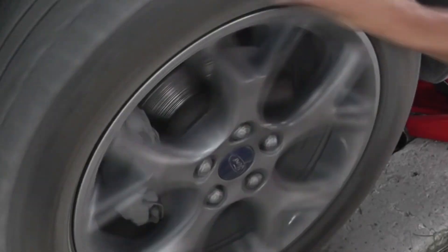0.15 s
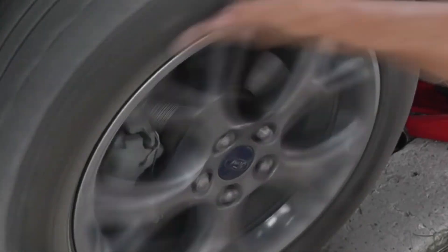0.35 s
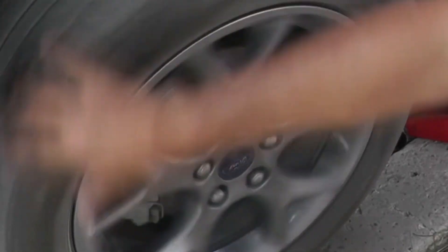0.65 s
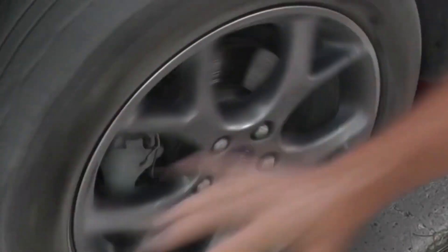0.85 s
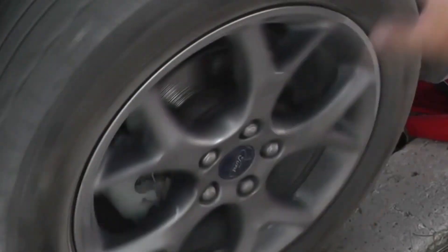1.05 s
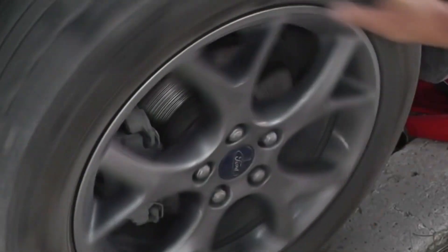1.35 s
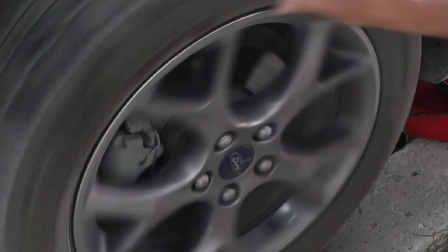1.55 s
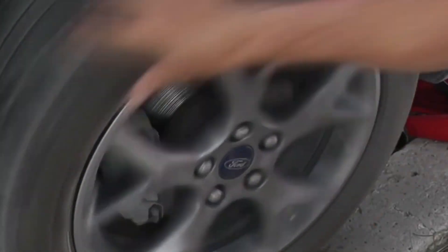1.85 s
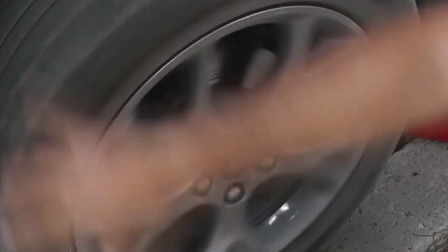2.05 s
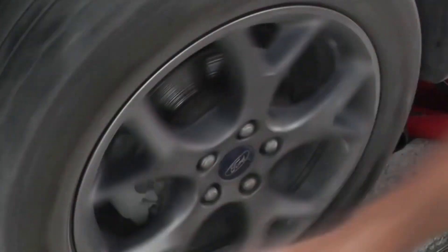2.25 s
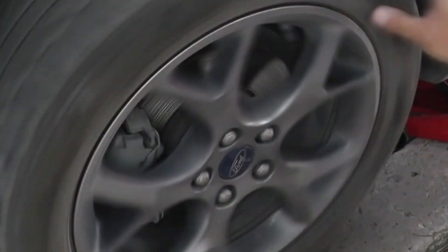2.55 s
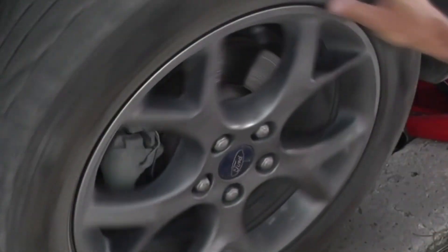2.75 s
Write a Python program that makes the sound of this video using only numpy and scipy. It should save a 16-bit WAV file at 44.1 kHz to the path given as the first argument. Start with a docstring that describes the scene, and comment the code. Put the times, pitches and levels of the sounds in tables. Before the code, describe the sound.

High fluttering squeal of worn car brake pads over a scraping hiss as the wheel turns.

```python
"""A car wheel is spun by hand while its worn brake pads drag on the disc.
From the start the rubbing scrapes and rings the disc and the caliper (the clamp holding the pads),
and the wheel drones faintly. Friction also locks two of the disc's own notes into a fluttering squeal.
The lower one peaks near 0.5 s, just after the first of several dull scuffs. The higher one takes over,
fades near 1.4 s, swells again and dies down as the scrape goes on to the end."""
import sys
import numpy as np
from scipy import signal
from scipy.fft import rfft, irfft
from scipy.io import wavfile
from scipy.ndimage import uniform_filter1d

SR = 44100
rng = np.random.default_rng(int(sys.argv[2]) if len(sys.argv) > 2 else 0)


def store_pcm(level_fs):
    """Save levels as 16-bit WAV."""
    pcm = np.round(np.clip(level_fs, -1, 1) * 32767).astype(np.int16)
    wavfile.write(sys.argv[1], SR, np.atleast_2d(pcm).T)


N = 127890
T = np.arange(N) / SR
HZ = np.fft.rfftfreq(N, 1 / SR)


def amp(db):
    """Turns decibels into a number to multiply by."""
    return 10 ** (np.asarray(db) / 20)


def unit(x):
    """Scales a signal to an average strength (rms) of 1."""
    return x / np.sqrt(np.mean(abs(x) ** 2) + 1e-20)


def curve(rows):
    """Joins (time_s, value) rows by straight lines."""
    return np.interp(T, *np.transpose(rows))


def bump(peak_s, half_length_s):
    """A smooth rise to 1 and back."""
    return np.exp(-.5 * ((T - peak_s) / half_length_s) ** 2)


def noise(gain):
    """Noise of strength 1, shaped by a gain for each frequency."""
    return unit(irfft(rfft(rng.standard_normal(N)) * gain, N))


def wander(rate_hz):
    """Smooth random wobble, up to about the given rate."""
    return noise((HZ > 0) / (1 + (HZ / rate_hz) ** 4))


def coloured(colour):
    """Noise with a given tone colour; countless weak resonances make it slightly metallic."""
    pitch_hz, level_db = np.transpose(colour)
    outline_db = np.interp(np.log(HZ + 1), np.log(pitch_hz), level_db)
    window = np.hanning(round(2 * 22 / HZ[1]))  # ripples about 22 Hz wide
    ripple = unit(signal.oaconvolve(rng.standard_normal(len(HZ)), window, "same"))
    depth_db = 2.8 * HZ ** 2 / (HZ ** 2 + 450 ** 2)  # the bass stays smooth
    low_cut = 1 + (1.18 * pitch_hz[0] / (HZ + 1)) ** 4
    high_cut = 1 + (HZ / (1.04 * pitch_hz[-1])) ** 4
    return noise(amp(outline_db + depth_db * ripple) / (low_cut * high_cut))


def patchy(x):
    """The spot where the pad touches keeps shifting, so each pitch range swells and sinks on its own."""
    patch_hz, patch_s = 200, 0.06
    spectra = signal.stft(x, nperseg=512)[2]
    across_pitch = np.hanning(round(2 * patch_hz * 512 / SR))
    across_time = np.hanning(round(2 * patch_s * SR / 256))
    patch = np.outer(across_pitch, across_time)
    swell_db = 1.8 * unit(signal.fftconvolve(rng.standard_normal(spectra.shape), patch, "same"))
    return unit(signal.istft(spectra * amp(swell_db))[1][:N])


def ringing(notes):
    """Rubbing makes a part ring at its own notes, each a narrow band of noise."""
    out = np.zeros(N)
    for pitch_hz, width_hz, level_db in notes:
        offset = 2 * (HZ - pitch_hz) / width_hz
        out += amp(level_db) * noise(1 / np.sqrt(1 + offset ** 2) / (1 + (offset / 12) ** 2))
    return out


def scrape():
    """The pads rub the disc with a gritty rasp and a hiss, and the disc rings along."""
    # loudness of the rasp and of the hiss: time_s, level_db
    rasp_levels = [(0.0, -44), (0.175, -42.5), (0.195, -46), (0.355, -40.5), (0.785, -46), (0.855, -42),
                   (1.17, -46.5), (1.19, -44), (1.3, -49), (1.34, -45), (1.515, -45.5), (1.945, -43),
                   (1.97, -44), (2.0, -42), (2.215, -48), (2.225, -44), (2.365, -46), (2.47, -44.5),
                   (2.725, -45), (2.9, -46.5)]
    hiss_levels = [(0.0, -56), (0.08, -56), (0.36, -48.5), (0.41, -53), (0.5, -56), (0.55, -53.5),
                   (0.81, -55.5), (0.86, -49.5), (0.98, -57.5), (1.0, -53.5), (1.32, -59), (1.36, -51.5),
                   (1.47, -56.5), (1.8, -50), (2.3, -55.5), (2.54, -53.5), (2.72, -60), (2.9, -56)]
    # their tone colours: pitch_hz, level_db
    rasp_colour = [(2500, -12.5), (3600, -4), (4200, -4), (4500, -4.5), (5000, -3.5), (5380, -4.5),
                   (5900, -1), (6150, -6), (6520, -8), (6900, 2.5), (7600, -4.5), (8500, -20)]
    hiss_colour = [(5000, 1), (7000, 0), (7900, 3), (8600, -3), (9600, 1.5), (11000, -2), (12200, -2),
                   (13800, -12), (15500, -8)]
    # the disc's own notes: pitch_hz, width_hz, level_db
    disc_notes = [(4025, 16, -65), (4066, 10, -59), (4335, 24, -60), (4400, 20, -62), (4475, 30, -62),
                  (4790, 22, -55), (4867, 12, -52), (5220, 20, -60), (5527, 12, -57), (5922, 20, -55),
                  (6000, 30, -62), (6355, 36, -55.5), (6674, 16, -53), (6767, 20, -50.5), (6860, 24, -60),
                  (6991, 20, -56), (7430, 40, -64), (7570, 30, -63)]
    level = curve(rasp_levels)
    rasp = amp(level - 2.5 + 2.6 * wander(rate_hz=32)) * patchy(coloured(rasp_colour))
    hiss = amp(curve(hiss_levels) + 4.5 + 2.03 * wander(rate_hz=26)) * coloured(hiss_colour)
    ring = amp(level - level.mean() - 0.8 + 2.5 * wander(rate_hz=17.8)) * ringing(disc_notes)
    return rasp + hiss + ring


def grind():
    """The lower part of the scrape passes into the caliper and makes it ring."""
    # loudness of the grinding: time_s, level_db
    levels = [(0.0, -57.5), (0.17, -48), (0.22, -52), (0.31, -45), (0.77, -55), (0.89, -48), (0.92, -55),
              (1.04, -51.5), (1.07, -55), (1.54, -50), (1.58, -53.5), (1.65, -49.5), (2.07, -48.5),
              (2.21, -53), (2.24, -48.5), (2.28, -57), (2.38, -50.5), (2.48, -49), (2.85, -59), (2.87, -52),
              (2.9, -57)]
    # its tone colour: pitch_hz, level_db
    colour = [(500, 13), (900, -7.5), (1300, -1.5), (1950, -2), (2450, 1.5), (2850, 10), (3400, -6.5),
              (4500, -5.5)]
    # the caliper's own notes: pitch_hz, width_hz, level_db
    caliper_notes = [(1130, 30, -68), (1200, 25, -66), (1314, 8, -59.5), (1611, 11, -59.5), (1730, 25, -66),
                     (1995, 20, -69), (2050, 20, -68), (2121, 16, -65), (2353, 14, -67), (2725, 16, -66),
                     (2783, 14, -63), (2910, 50, -63), (3020, 30, -66), (3452, 14, -63), (3731, 40, -62)]
    level = curve(levels)
    grinding = amp(level - 4.5 + 2.4 * wander(rate_hz=26)) * patchy(coloured(colour))
    ring = amp(level - level.mean() - 2) * ringing(caliper_notes)
    return grinding + ring


def wheel():
    """The turning wheel drones and gives a hollow hum, and its rim rings with the drone."""
    # loudness of the drone and of the hum: time_s, level_db
    drone_levels = [(0.0, -49.5), (0.41, -51), (0.58, -53.5), (0.78, -58.5), (0.88, -54.5), (1.12, -54.5),
                    (1.28, -50), (1.45, -47), (2.05, -52.5), (2.32, -56), (2.43, -51.5), (2.64, -52),
                    (2.9, -51.5)]
    hum_levels = [(0.0, -72), (0.1, -57.5), (0.37, -70), (0.48, -55.5), (0.8, -64), (0.88, -59.5),
                  (1.1, -64), (1.45, -55), (1.62, -57.5), (2.16, -70.5), (2.52, -53), (2.76, -51.5),
                  (2.9, -57.5)]
    # tone colour of the drone: pitch_hz, level_db
    colour = [(20, -7), (55, -6.5), (110, -5), (200, -2.5), (280, 1.5), (450, -1.5), (700, -1), (1100, -5),
              (2200, -8.5)]
    # ringing of the rim and around the hum: pitch_hz, width_hz, level_db
    rim_notes = [(195, 20, -67), (285, 24, -67), (355, 14, -68), (470, 18, -67), (554, 7, -60.5),
                 (670, 36, -64), (800, 10, -62), (905, 14, -66), (975, 20, -68)]
    hum_notes = [(408, 16, -5)]
    level = curve(drone_levels)
    drone = amp(level - 5.5 + 2.5 * wander(rate_hz=50)) * coloured(colour)
    rim = amp(level - level.mean() - 2.5) * ringing(rim_notes)
    hum_hz = 405 + 3 * wander(rate_hz=14.6)
    tone = np.sqrt(2) * np.sin(2 * np.pi * np.cumsum(hum_hz) / SR)
    hum = amp(curve(hum_levels) + 1) * (amp(-2.5) * tone + ringing(hum_notes))
    return drone + rim + hum


def squeal(levels, pitch_hz, octave_gain=0):
    """Friction keeps one disc note going: a nearly pure tone whose pitch dips when the pad slips."""
    flutter_db, jitter_hz, sag_hz_per_db = 0.55, 3, 2.4
    level = uniform_filter1d(curve(levels), size=300) + flutter_db * wander(rate_hz=45)
    grip_db = level - uniform_filter1d(level, size=5000)  # below zero in a brief dip
    wavering_hz = pitch_hz + sag_hz_per_db * grip_db + jitter_hz * wander(rate_hz=124)
    phase = 2 * np.pi * np.cumsum(wavering_hz) / SR
    return amp(level) * (np.sin(phase) + octave_gain * np.sin(2 * phase)) * np.sqrt(2)


def squeals():
    """Two disc notes take turns at squealing as the disc goes round."""
    # loudness of each squeal: time_s, level_db
    low_levels = [(0.0, -46), (0.065, -38.5), (0.115, -28.0), (0.155, -32), (0.17, -39), (0.205, -30.5),
                  (0.23, -31), (0.25, -41), (0.29, -29.5), (0.31, -26), (0.335, -40), (0.36, -26),
                  (0.455, -20), (0.5, -24), (0.535, -49), (0.585, -26.5), (0.65, -33.0), (0.67, -44),
                  (0.74, -39.5), (0.755, -57.0), (0.78, -41.0), (0.795, -68), (0.925, -38.5), (0.98, -54),
                  (1.055, -40), (1.165, -60), (1.215, -44), (1.24, -58), (1.325, -29.5), (1.405, -33.5),
                  (1.45, -45.5), (1.48, -36), (1.555, -47), (1.65, -34.5), (1.665, -48), (1.75, -36),
                  (1.765, -52), (1.875, -55.0), (1.895, -44.5), (1.985, -56), (2.035, -44), (2.08, -69),
                  (2.17, -43), (2.2, -66), (2.36, -45), (2.42, -65), (2.445, -41), (2.47, -54),
                  (2.505, -50), (2.625, -49), (2.65, -40), (2.83, -44), (2.85, -38.5), (2.9, -49)]
    high_levels = [(0.0, -41.0), (0.035, -52.5), (0.105, -39.5), (0.16, -42), (0.195, -49), (0.24, -36.5),
                   (0.33, -45), (0.375, -29.5), (0.46, -36.5), (0.495, -28.0), (0.515, -37.5),
                   (0.56, -21.5), (0.57, -27.5), (0.67, -19), (0.705, -23), (0.715, -31.5), (0.735, -21.0),
                   (0.775, -22.5), (0.785, -30.5), (0.84, -23), (0.855, -37), (0.885, -30.5),
                   (0.905, -18.5), (0.93, -25), (0.97, -21.0), (0.99, -25.5), (1.005, -21.5), (1.035, -34),
                   (1.045, -27), (1.065, -26), (1.125, -24.5), (1.14, -30.5), (1.175, -28), (1.19, -42),
                   (1.215, -32.5), (1.285, -46.5), (1.415, -61), (1.435, -45), (1.535, -55), (1.565, -37),
                   (1.585, -56), (1.625, -32.5), (1.66, -37.5), (1.715, -22.5), (1.755, -27), (1.79, -17),
                   (1.81, -28), (1.855, -29.5), (1.91, -21.5), (1.92, -31), (1.93, -35.5), (1.94, -22.5),
                   (1.95, -19.5), (1.98, -33.5), (1.99, -22.5), (2.03, -40), (2.04, -32), (2.065, -18.5),
                   (2.08, -21), (2.095, -27.5), (2.115, -17), (2.125, -19.0), (2.135, -25), (2.155, -19),
                   (2.2, -25.0), (2.225, -21), (2.26, -21), (2.285, -48), (2.305, -31.5), (2.33, -64),
                   (2.35, -31.5), (2.36, -44), (2.38, -26.5), (2.4, -47), (2.42, -28.5), (2.505, -31),
                   (2.56, -21), (2.645, -42), (2.745, -38), (2.83, -46.5), (2.875, -63), (2.9, -44.5)]
    # their drifting pitches: time_s, pitch_hz
    low_pitch = [(0, 5103), (0.2, 5108), (0.38, 5099), (0.57, 5109), (1.5, 5112), (1.62, 5099),
                 (1.72, 5112), (2.3, 5098), (2.65, 5111), (2.9, 5102)]
    high_pitch = [(0, 7150), (0.25, 7146), (0.55, 7161), (0.85, 7156), (0.95, 7164), (1.25, 7159),
                  (2.2, 7167), (2.45, 7168), (2.7, 7159), (2.9, 7163)]
    # brief breaks in the lower squeal: middle_s, half_length_s, dip_db
    breaks = [(1.543, 0.0049, -14), (2.823, 0.0072, -20)]
    dips_db = sum(dip_db * bump(middle_s, half_s) for middle_s, half_s, dip_db in breaks)
    low = amp(dips_db) * squeal(low_levels, curve(low_pitch))
    high = squeal(high_levels, curve(high_pitch), octave_gain=amp(-39))
    return low + high


def singing():
    """Four weaker disc notes hover on the edge of squealing: part tone, part ringing noise."""
    # loudness of two notes below the squeals and two between them: time_s, level_db
    low_below = [(0, -53), (0.23, -82), (0.4, -49), (0.55, -47), (0.7, -63), (0.9, -56), (1.25, -74),
                 (1.77, -51.5), (2.25, -61), (2.9, -54)]
    high_below = [(0, -57), (0.3, -65), (0.4, -36.5), (0.5, -57), (0.6, -48), (0.75, -66), (0.88, -50),
                  (1.0, -63), (1.6, -53), (1.9, -64), (2.24, -47.5), (2.42, -63), (2.9, -53)]
    low_between = [(0.0, -43), (0.125, -42), (0.18, -35), (0.285, -50), (0.32, -43), (0.455, -66),
                   (0.605, -37), (0.66, -52), (0.78, -38), (0.83, -60), (0.9, -42), (1.01, -60),
                   (1.085, -41), (1.13, -48), (1.195, -34.5), (1.325, -63), (1.34, -52), (1.695, -45),
                   (1.815, -63), (1.88, -42), (2.065, -68), (2.255, -42), (2.33, -51), (2.465, -44),
                   (2.63, -61), (2.9, -46.0)]
    high_between = [(0.0, -45), (0.18, -55), (0.225, -37), (0.37, -66), (0.415, -47), (0.595, -69),
                    (0.71, -54), (0.815, -52), (0.9, -52), (0.96, -51), (1.13, -47.5), (1.225, -56.5),
                    (1.355, -43), (1.785, -52), (2.215, -68), (2.4, -40), (2.44, -55.0), (2.75, -56),
                    (2.805, -40), (2.9, -46)]
    notes = [(low_below, 4313), (high_below, 4623), (low_between, 5599), (high_between, 5785)]
    out = np.zeros(N)
    for levels, pitch_hz in notes:
        ring = amp(curve(levels)) * ringing([(pitch_hz, 14, -8)])
        out += amp(-2.5) * squeal(levels, pitch_hz) + ring
    return out


def scuffs():
    """The turning wheel scuffs now and then: short, dull puffs of noise."""
    # each scuff: peak_s, half_length_s, level_db
    puffs = [(0.403, 0.0056, -45.5), (0.571, 0.013, -50.5), (0.738, 0.0037, -46), (0.865, 0.033, -52.5),
             (1.477, 0.016, -43), (1.605, 0.0098, -56), (2.057, 0.0048, -47), (2.214, 0.013, -49),
             (2.487, 0.021, -50.5), (2.881, 0.016, -44.5)]
    # their tone colour: pitch_hz, level_db
    colour = [(30, -29), (110, 1), (190, 4), (450, 2), (900, -4.5), (1500, -4.5), (3000, -21)]
    loudness = sum(amp(level_db) * bump(peak_s, half_s) for peak_s, half_s, level_db in puffs)
    return loudness * coloured(colour)


def scene():
    """Brake and wheel, heard from close by in one channel."""
    return (scrape() + grind() + wheel() + squeals() + singing() + scuffs())[None]


def record(dry):
    """Cuts away the highest treble, above 15700 Hz."""
    treble_cut = signal.firwin(511, 15700, window=("kaiser", 9), fs=SR)
    return signal.oaconvolve(dry, treble_cut[None], "same")


dry = scene()
out = record(dry)
store_pcm(out)
```